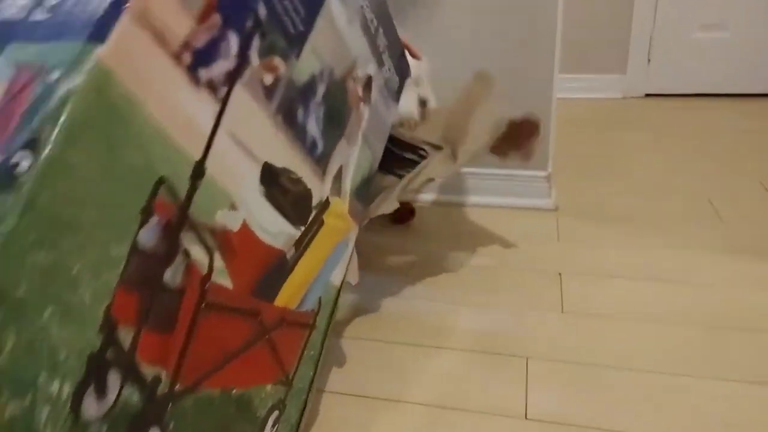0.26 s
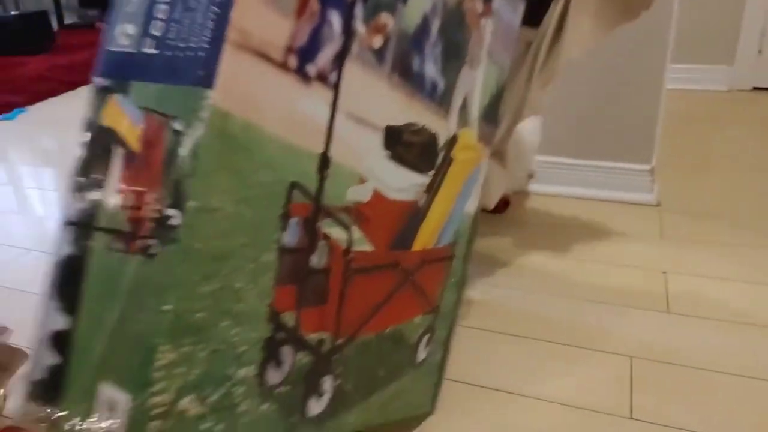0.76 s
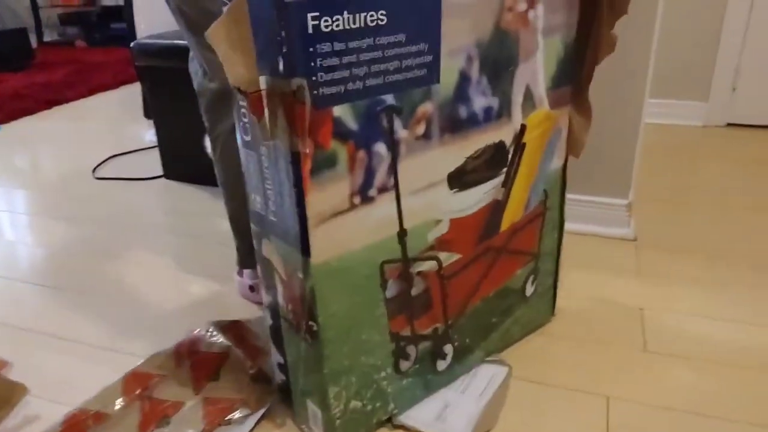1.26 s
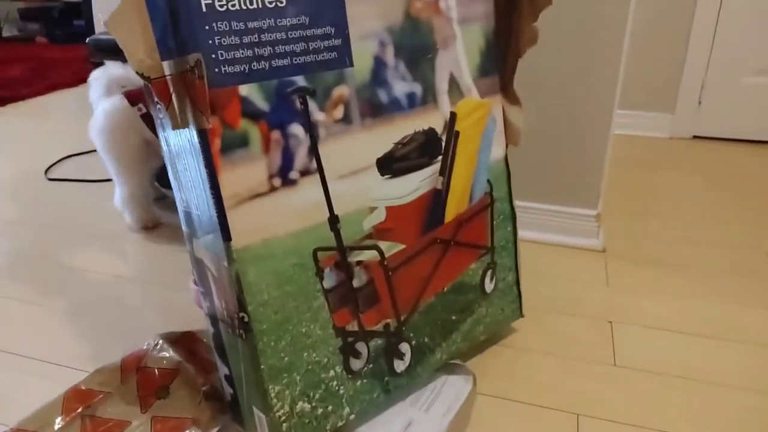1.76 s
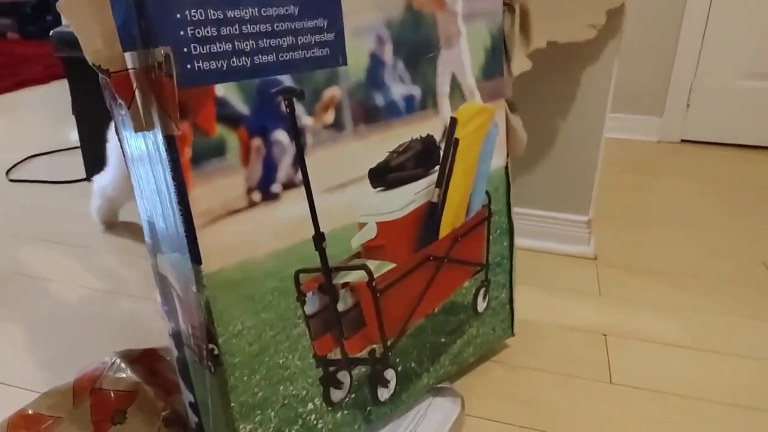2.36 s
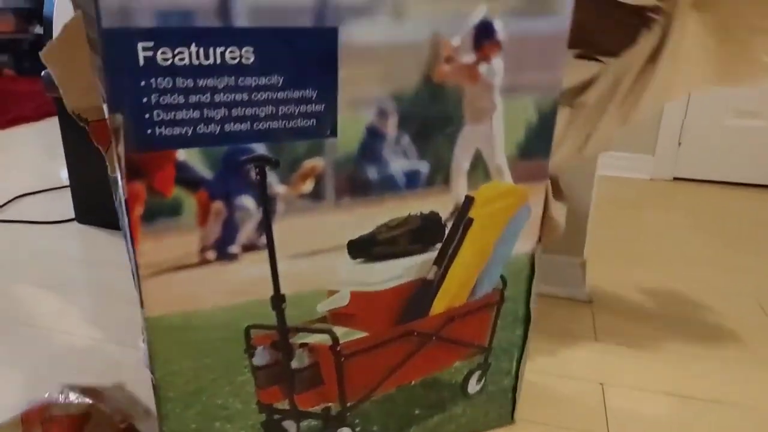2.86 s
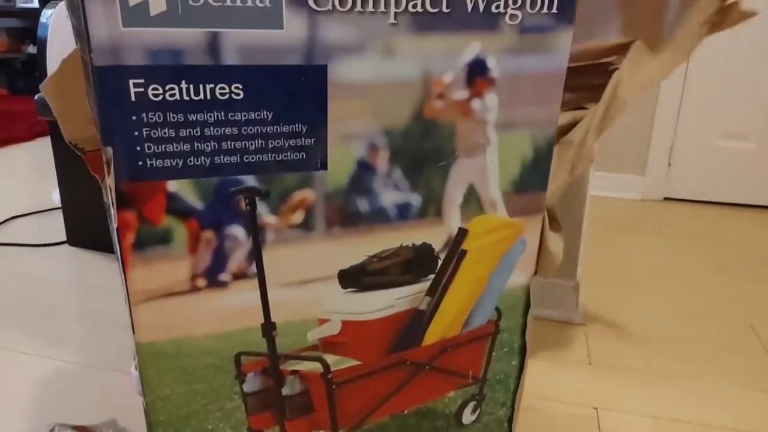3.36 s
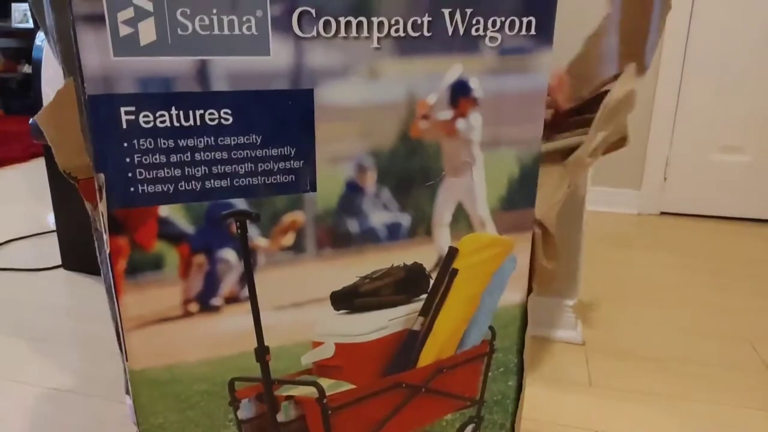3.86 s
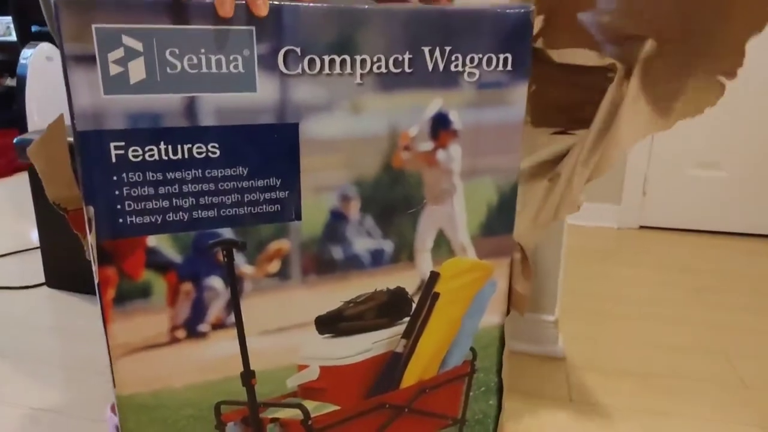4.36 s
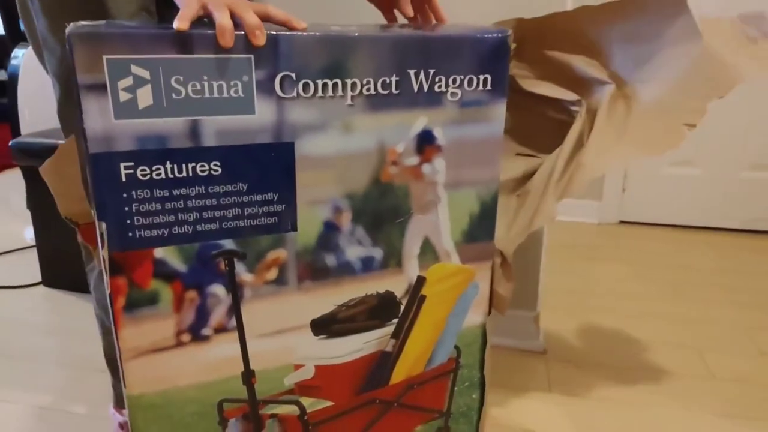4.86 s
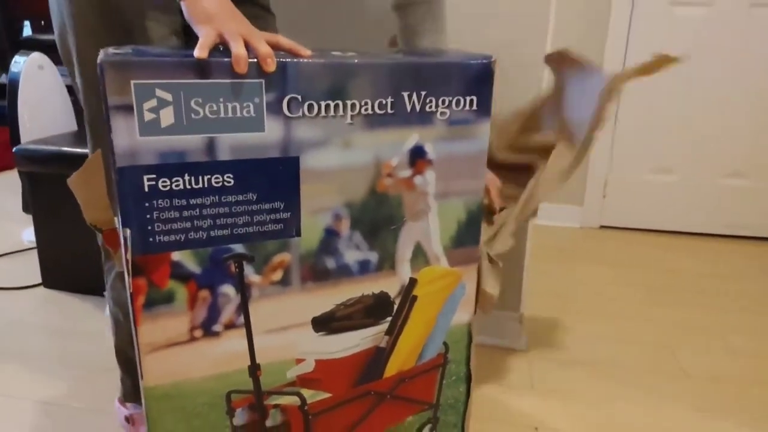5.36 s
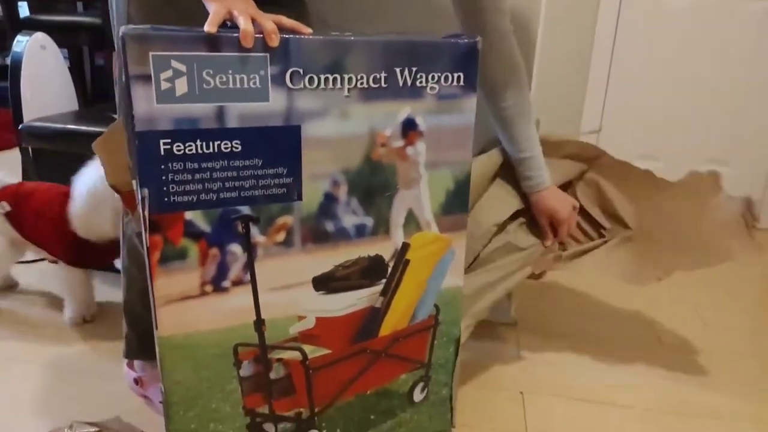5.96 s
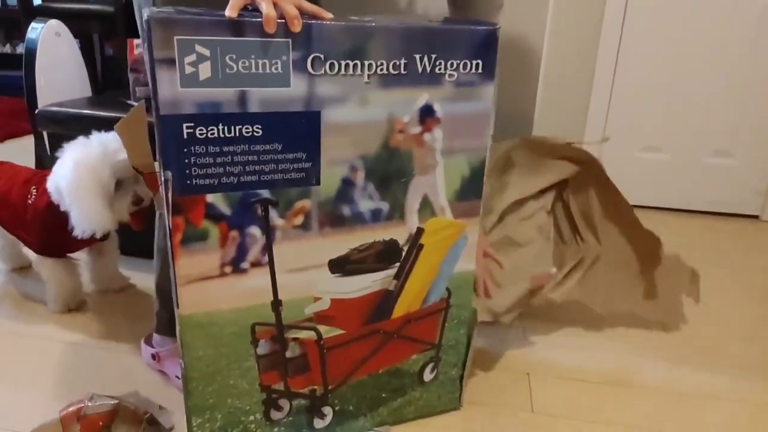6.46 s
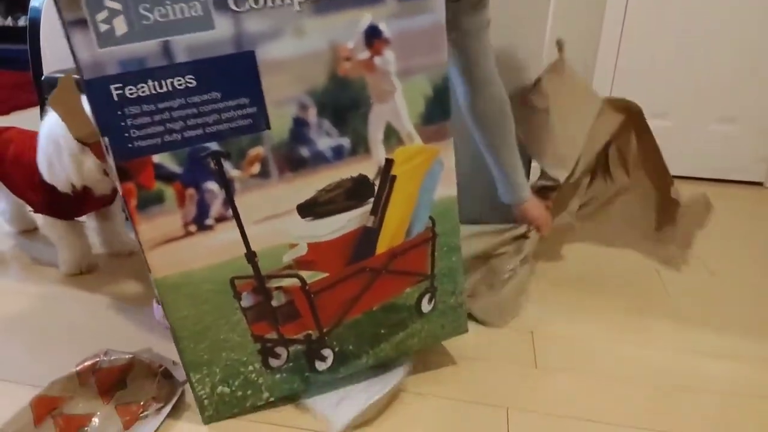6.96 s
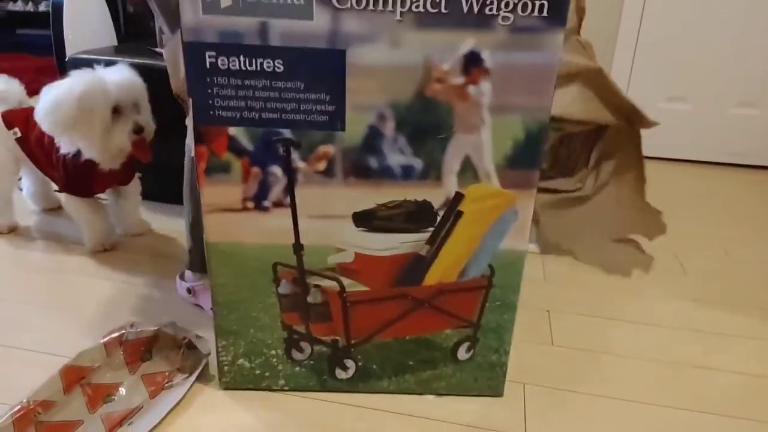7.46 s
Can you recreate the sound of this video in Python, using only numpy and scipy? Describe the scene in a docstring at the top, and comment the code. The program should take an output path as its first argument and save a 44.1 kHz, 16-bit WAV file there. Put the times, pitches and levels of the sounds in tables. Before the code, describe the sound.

A big carton is unwrapped indoors, heard by one close microphone. Dry creases snap and fine crackle swells as the box shifts and bumps the floor. Quieter fidgeting rustles follow, thinning to almost nothing before five seconds. Then the paper is ripped and crushed hard in two loud surges, with boomy panel flaps and low hollow thuds, and keeps crackling to the end. Short room tail.

```python
"""Stiff wrapping paper is pulled off a big cardboard box and crumpled in a hard-floored room.
Creases buckle as showers of tiny cracks through ringing facets, and as loud single snaps from noise bursts.
Wide panels boom dully as clicks excite broad resonances; the hollow box rings in six modes under drag and knocks.
Near echoes follow the crackle and rumble; a diffuse tail follows these, the snaps and the knocks.
A faint hush lies under it all. One microphone hears everything, copied to both channels."""
import sys
import numpy as np
from scipy import signal
from scipy.fft import rfft, irfft
from scipy.io import wavfile

SR = 44100
rng = np.random.default_rng(int(sys.argv[2]) if len(sys.argv) > 2 else 0)


def to_wav(sig):
    """Store sig (one row per channel, or 1-D mono) as 16-bit WAV at the path in sys.argv[1].

    Samples outside -1..1 are clipped; the rate is SR.
    """
    pcm = np.clip(np.atleast_2d(sig), -1, 1) * 32767
    pcm = np.round(pcm).astype(np.int16)
    wavfile.write(sys.argv[1], SR, pcm.T)  # frames by channels


N = 340011   # length in samples


def rustle():
    """Handling drives fine cracks, the panels between creases and the box under the paper."""
    crackle_gain = from_db(handling())
    paper = paper_crackle(crackle_gain)
    rumble, heave = box_drag(crackle_gain)
    return paper + rumble, heave


# How hard the sheet is pulled: time_s [s], crackle_db [dB]
PULL_CURVE = [(0, -44), (.22, -44.5), (.39, -57), (.47, -46), (.55, -57), (.66, -45), (.86, -42),
              (.93, -37), (1.14, -34.5), (1.3, -46.5), (1.48, -73), (2.06, -55.5), (2.3, -56), (2.45, -52),
              (2.55, -55), (2.7, -78), (2.77, -55), (3.03, -53), (3.26, -63), (3.4, -46), (3.85, -52.5),
              (4.23, -58.5), (4.64, -79), (5.26, -75.5), (5.41, -37.5), (5.72, -36.5), (6.05, -47.5),
              (6.2, -45), (6.44, -54), (6.54, -35), (6.7, -35.5), (7.07, -33.5), (7.34, -38), (7.45, -35.5),
              (7.62, -42), (7.71, -40)]
# A hand closes on the paper: peak_s [s], crackle_db [dB], rise_s [s]
HAND_GRABS = [(.13, -45, .05), (.2, -43, .03), (1.07, -44.5, 0.025), (1.59, -52, .08), (1.95, -63, 0.13),
              (2.12, -41, 0.032), (2.19, -40.5, .04), (2.25, -38.5, 0.077), (2.53, -49, .02),
              (2.6, -42, .015), (2.63, -46, 0.059), (2.86, -47.5, 0.1), (2.942, -46, 0.013),
              (3.06, -41, .015), (3.15, -43.5, 0.049), (3.281, -43, 0.011), (3.5, -36.5, 0.08),
              (3.56, -37.5, 0.1), (3.71, -49, 0.024), (3.949, -39.5, 0.17), (4.17, -58.5, 0.023),
              (4.44, -62, 0.11), (4.76, -76, .02), (5.01, -68, .02), (5.16, -61, 0.069),
              (5.52, -38.5, 0.032), (5.6, -30.5, 0.024), (5.67, -31.5, 0.033), (5.752, -19.5, 0.011),
              (5.829, -22, 0.1), (5.9, -31, 0.095), (6.098, -37.5, 0.023), (6.809, -18.5, 0.093),
              (6.892, -17.5, 0.084), (6.96, -23.5, 0.15), (7.18, -49, 0.026), (7.41, -41, 0.18)]
RISE_FROM_DB, LET_GO_DB_PER_S = -14, 151   # a grab swells from this far down, then dies away


def handling():
    """Crackle level in dB: the steady pull and every grab add up in power."""
    coarse_t = np.arange(0, N + 64, 64) / SR
    grab_power = 0
    for peak_s, crackle_db, rise_s in HAND_GRABS:
        swell_db = RISE_FROM_DB * (peak_s - coarse_t) / max(rise_s, .005)
        fade_db = LET_GO_DB_PER_S * (peak_s - coarse_t)
        grab_db = crackle_db + np.where(coarse_t < peak_s, swell_db, fade_db)
        grab_power = grab_power + from_db(grab_db) ** 2
    grab_power = np.interp(np.arange(N) / SR, coarse_t, grab_power)
    pull_power = from_db(in_time(PULL_CURVE)[0]) ** 2
    return 10 * np.log10(grab_power + pull_power)


# How the sheet is held: time_s [s], crisp_db (crackle above CRISP_HZ) [dB re crackle],
# boom_db (panel boom) [dB re crackle]
SHEET_HOLD = [(0, -9, 5), (.38, -11, -0.5), (.53, -19, 2), (.65, -8, -6), (.8, -0.5, -7), (1.1, -2, 2),
              (1.61, -16, 3.5), (1.94, -3, -0.5), (2.2, -6.5, -1.5), (2.65, -12, -11), (2.9, -3.5, -7.5),
              (3.3, -6, -3.5), (3.71, -14.5, -5.5), (3.96, -18, -13), (4.09, 2.5, -2), (4.5, -28, 2),
              (4.75, -6, 6), (5.05, -12, -3), (5.64, -6, -1), (6.0, -12, -5.5), (6.28, 0, -7),
              (6.34, -8, 0), (6.4, -19, -4), (6.79, -1, 1.5), (7.1, -10, -2), (7.71, -3.5, 0)]
# Tone of the cracks at the microphone, also used by the snaps: pitch_hz [Hz], density_db [dB per Hz]
PAPER_TONE = [(760, -23.5), (1300, -6), (1570, -4.5), (2090, -8), (2710, -4.5), (3420, -6.5), (3920, -2.5),
              (5090, -2.5), (5660, -5), (6550, -5.5), (8520, -12.5), (11300, -4), (11900, -4.5),
              (13100, -23.5), (16000, -20)]
MELLOW_HZ, CRISP_HZ = 2600, 8000   # upper edge of mellow and lower edge of crisp crackle
MELLOW_DB, MELLOW_FOLLOWS = -9, 0.23   # mellow re crackle; share of the boom's dB swing it follows
FIBRE_DB, FIBRE_FOLLOWS = 7.5, 0.31   # fibres re facets at 0 dB crackle; share of the crackle's dB swing
TICKS_PER_S, TICK_DB = 45, -13   # lone dry ticks of small creases, re crackle


def paper_crackle(crackle_gain):
    """Cracks ring facets, fibres tear dry and ticks stand alone; the bands are balanced by the hold."""
    crisp_db, boom_db = in_time(SHEET_HOLD)
    shower = cracks(14000, spread_db=2.5, clump_db=0.0, clump_hz=44.4)
    dealt = rng.integers(0, 36, N)
    facets = 0
    # every facet has a pitch of its own and rings a few cycles
    for k, hz in enumerate(np.geomspace(1300, 16000, 36)):
        facets = facets + resonance(shower * (dealt == k), hz, 0.15 * hz) * hz ** -.5
    fibres = cracks(20000, spread_db=0.5, clump_db=2.0, clump_hz=60)   # dense, dry, no pitch
    texture = rms_one(facets) + from_db(FIBRE_DB) * crackle_gain ** FIBRE_FOLLOWS * fibres
    ticks = resonance(cracks(TICKS_PER_S, spread_db=3.0, clump_db=1.5, clump_hz=5), 8200, 7000)
    texture = rms_one(texture) + from_db(TICK_DB) * rms_one(ticks)

    dull, crisp = split(colour(texture, PAPER_TONE), CRISP_HZ)
    mellow, plain = split(dull, MELLOW_HZ)
    mellow_gain = from_db(MELLOW_DB + MELLOW_FOLLOWS * boom_db)
    balanced = rms_one(plain) + mellow_gain * rms_one(mellow)
    balanced = balanced + from_db(crisp_db) * rms_one(crisp) + from_db(boom_db) * panel_boom()
    return crackle_gain * balanced


# Tone of the sheet's wide panels: pitch_hz [Hz], level_db [dB per Hz]
PANEL_TONE = [(200, -37), (340, -4.5), (387, -2.5), (450, -3.5), (566, 6), (772, -1.5), (1500, -1.5),
              (1950, -35), (3300, -120)]


def panel_boom():
    """Wide panels between creases: sparser pops dealt to 14 broad resonances that wander in level."""
    dealt, pops = rng.integers(0, 14, N), cracks(4000, spread_db=1.0, clump_db=3.0, clump_hz=30.8)
    boom = 0
    for k, hz in enumerate(np.geomspace(340, 1300, 14)):
        ring = resonance(pops * (dealt == k), hz, 0.098 * hz)
        boom = boom + wandering_gain(30, spread_db=2.5) * from_db(at_hz(PANEL_TONE, hz)) * ring
    return rms_one(boom)


# Single creases snapping, levels set before the tone of the paper: start_s [s], level_db [dB peak],
# crease_hz [Hz], edge_db (crisp edge) [dB re level_db], pop_db (dull pop) [dB re level_db], pop_hz [Hz]
CREASE_SNAPS = [(.05, -13.5, 4000, 7.5, -20, 1260), (.121, -18, 5200, 6, -26, 990),
                (0.176, -11, 5600, 1, -20, 900), (.329, -18, 2750, -0.5, -24, 996),
                (.408, -21, 1520, -8, -11.5, 860), (.509, -33.5, 2650, -24, 7, 816),
                (.581, -15.5, 2800, -0.5, -21, 1380), (.965, -12, 6440, -6, -19.5, 510),
                (1.025, -16, 1670, -5, -5, 1160), (1.074, -22, 1560, 2, -7, 1050),
                (1.41, -35, 6200, -9, -35, 533), (1.505, -37, 2330, -9, -11, 790),
                (1.555, -25.5, 2740, -3, -14, 1150), (1.675, -21.5, 6000, -8, -21.5, 480),
                (1.932, -24, 2940, 9, -43, 1510), (2.022, -22.5, 1710, -26, -26, 460),
                (2.113, -19, 6350, 12.5, -9.5, 490), (2.167, -15, 4600, 6, -28, 567),
                (2.222, -18.5, 6130, 7.5, -12.5, 423), (2.236, -17, 3400, 6, -10.5, 870),
                (2.419, -24.5, 7640, 6, -19, 1310), (2.511, -28, 6300, 4, -21, 837),
                (2.588, -25.5, 3850, 7, -10.5, 960), (2.748, -37, 4850, 2, -23, 1010),
                (2.991, -33.5, 8100, 20.5, -18, 810), (3.044, -16.5, 2580, -8, -22.5, 960),
                (3.079, -24, 2720, -6, -9, 1190), (3.123, -16.5, 2480, -1, -27, 880),
                (3.29, -15.5, 4960, 1.5, -36, 1150), (3.368, -18.5, 2870, 5.5, -19, 430),
                (3.453, -16, 4140, 1, -25, 560), (3.543, -27.5, 4220, 6, -3, 1180),
                (3.568, -19, 1530, 3, -13, 1120), (3.709, -29, 4320, -4, -6, 950),
                (3.792, -23.5, 4320, 15, -9.5, 960), (3.825, -23, 4150, 9, -17.5, 478),
                (3.894, -15, 3970, 2, -23.5, 460), (3.911, -21.5, 4220, 9, -8.5, 980),
                (3.932, -16, 4400, 12, -34, 1040), (3.942, -17, 2880, -15, -22, 1510),
                (4.153, -23, 4440, -2, -24, 1460), (4.498, -37.5, 2740, -24, -21, 674),
                (4.644, -47, 2780, -8, -10, 567), (4.738, -46.5, 3250, -18, -5, 1270),
                (4.985, -33.5, 3760, -30, -27, 496), (5.144, -31, 1460, -3, -49, 1390),
                (5.315, -34, 4630, 8, -25, 560), (5.33, -24, 2900, 1, -20, 1010),
                (5.373, -20, 4080, 0, -8.5, 1230), (5.395, -19, 5190, 5, -7, 590),
                (5.443, -23, 4500, 11, -22, 570), (5.527, -16.5, 2290, 10, -12, 1160),
                (5.593, -8.5, 6800, 11, -9, 725), (5.645, -9, 4400, -5, -13, 640),
                (5.656, -3, 6430, 3, -11, 730), (5.734, -3, 6930, 2, -18.5, 765),
                (5.747, 4.5, 5060, 8.5, -19, 554), (5.833, -5.5, 4000, 11, -17, 546),
                (6.084, -16.5, 4640, 2, -15.5, 500), (6.209, -28, 3900, -1, -31, 563),
                (6.324, -22, 3780, -22, -19, 1230), (6.462, -32.5, 4090, 11.5, -27, 587),
                (6.506, -20.5, 4260, 0, -12.5, 926), (6.528, -27, 5100, 14, -9, 525),
                (6.56, -13, 4130, 5, -33, 560), (6.687, -14.5, 4230, 7, -9, 565),
                (6.748, -2, 3960, 4, -8.5, 1020), (7.175, -13, 5510, 8.5, -20.5, 604),
                (7.392, -13, 4150, -10, -33, 576)]
SNAP_S, AFTER_DB, AFTER_S = 0.0035, -7, 0.015   # length of a snap; level and fade of the crackle after it


def snaps():
    """A crease gives way in milliseconds and crackles on: a ring at its pitch, a crisp edge, a dull pop."""
    length = 4096
    t = np.arange(length) / SR
    body, edge, pop = np.zeros((3, N + length))
    after = from_db(AFTER_DB) * np.exp(-t / AFTER_S) * np.clip(t / 0.0064, 0, 1)
    shape = np.exp(-(2 * t / SNAP_S - 1) ** 2) + after
    noises = rng.standard_normal((len(CREASE_SNAPS), length))
    for row, noise in zip(CREASE_SNAPS, noises):
        start_s, level_db, crease_hz, edge_db, pop_db, pop_hz = row
        start = round(start_s * SR)
        here = slice(start, start + length)
        burst = noise * shape * np.clip(t / 0.0022, 0, 1)   # the crack runs along the crease
        ringing = .5 * burst + 0.84 * resonance(burst, crease_hz, .5 * crease_hz)
        body[here] += from_db(level_db) * peak_one(ringing)
        sharp = burst * np.exp(-t / 0.011)   # the highest pitches die first
        edge[here] += from_db(level_db + edge_db) * peak_one(sharp)
        flip = burst + 8.1 * (np.arange(length) == 40)   # the panel flips over in one stroke
        popped = resonance(resonance(flip, pop_hz, 0.28 * pop_hz), pop_hz, 1.86 * pop_hz)
        pop[here] += from_db(level_db + pop_db) * peak_one(popped)
    body_low = split(colour(body, PAPER_TONE), CRISP_HZ)[0]
    edge_high = split(colour(edge, PAPER_TONE), CRISP_HZ)[1]
    return (body_low + edge_high + pop)[:N]


# How much of the pull passes into the box, before the rumble and heave trims:
# time_s [s], load_db [dB re crackle]
BOX_DRIVE = [(0, -2), (.25, -6), (.7, -22), (.87, -20), (.93, -3.5), (1.15, 1.5), (1.2, 20), (1.45, -3.5),
             (1.9, -14), (2.2, 0.5), (2.6, -18), (2.68, -12), (2.9, -28), (3.1, -11), (3.4, -16),
             (3.56, -6), (3.9, -2), (4.3, -4.5), (4.65, 5), (5.3, -6), (5.5, -5), (5.65, 0), (5.88, -6.5),
             (5.95, -15), (6.3, -11), (6.53, -1), (6.65, -9), (6.78, -1), (6.9, -2.5), (7.0, -1.5),
             (7.21, -21), (7.34, -2), (7.42, -25), (7.5, 14), (7.6, 4), (7.71, -2)]
RUMBLE_FLICKER_DB = 2.0   # spread of the wandering rumble level


def box_drag(crackle_gain):
    """Noise at the level of the pull rings the hollow box and moves air with the whole of it."""
    load_db, = in_time(BOX_DRIVE)
    drag_gain = crackle_gain * from_db(load_db) * wandering_gain(20, spread_db=RUMBLE_FLICKER_DB)
    rumble = box_ring(rng.standard_normal((len(BOX_MODES), N)))
    heave = resonance(resonance(rng.standard_normal(N), 106, 44), 75, 72)   # air moved by the whole box
    return from_db(-5) * drag_gain * rms_one(rumble), from_db(-28.5) * drag_gain * rms_one(heave)


# The box knocks on the floor, levels set before the filters: start_s [s], level_db [dB],
# push_db (deep push) [dB re level_db], favoured_hz (pitch that the contact point favours) [Hz]
BOX_KNOCKS = [(1.078, -46, -39, 231), (1.168, -21.5, -20, 255), (1.214, -30, -5, 191),
              (1.27, -24, -30, 213), (2.127, -40, -32, 265), (2.24, -50, -41, 261), (2.671, -44, -32, 237),
              (2.944, -45.5, -27, 170), (3.084, -36, -39, 170), (3.498, -65, -37, 218),
              (3.816, -37, -35, 211), (3.921, -44, -31, 207), (4.621, -51.5, -30, 159),
              (5.246, -43, -24, 148), (5.585, -18, -40, 208), (5.735, -12.5, -26, 201),
              (6.527, -44, -41, 272), (6.756, -19.5, -25, 280), (6.836, -28, -30, 229),
              (7.316, -52, -34, 223), (7.482, -29.5, -25, 272), (7.567, -15.5, -35, 178),
              (7.662, -26, -42, 175)]


def knocks():
    """Soft contact lasting some milliseconds: new strengths for each mode, a slow push of air under them."""
    start_s, level_db, push_db, favoured_hz = np.transpose(BOX_KNOCKS)
    at = np.round(start_s * SR).astype(int)
    clicks, push = np.zeros((len(BOX_MODES), N)), np.zeros(N)
    chance_db = 2.5 * rng.standard_normal((len(at), len(BOX_MODES)))
    mode_hz = np.array(BOX_MODES)[:, 0]
    octaves_off = np.abs(np.log2(mode_hz / favoured_hz[:, None]))
    click_db = level_db[:, None] - 13.0 + chance_db - 20.0 * octaves_off
    clicks[:, at] = from_db(click_db).T
    push[at] = from_db(level_db + push_db + 58)   # the boost makes up for the narrow filters
    soft = signal.butter(2, 260, fs=SR, output="sos")
    knock = signal.sosfilt(soft, box_ring(clicks))
    return knock, resonance(resonance(resonance(push, 60, 61.5), 55, 90), 45, 60)


# Modes of the box: pitch_hz [Hz], level_db [dB], t60_s [s]
BOX_MODES = [(170, -8.5, 0.47), (196.4, -1.5, 0.29), (223.2, 2.5, 0.21), (273, 10.5, 0.093),
             (305, -20, 0.16), (384, -5, 0.14)]


def box_ring(drives):
    """The air and walls of the box: decaying modes, each driven by its own row."""
    out = 0
    for drive, (hz, level_db, t60_s) in zip(drives, BOX_MODES):
        r, w = from_db(-60 / (t60_s * SR)), 2 * np.pi * hz / SR
        gain = from_db(level_db) * np.sin(w)
        out = out + signal.lfilter([0, gain], [1, -2 * r * np.cos(w), r * r], drive + 1e-18)
    return out


def near_echoes(x):
    """Floor and box side send the sound again a moment later; the extra path wanders as the hands move."""
    now = np.arange(N)
    floor_delay = 0.000793 * SR * from_db(2.0 * drift(1.46))
    side_delay = .0027 * SR * from_db(1.487 * drift(1.14))
    floor = np.interp(now - floor_delay, now, x)
    side = np.interp(now - side_delay, now, x)
    return x + from_db(-9) * floor + from_db(-8) * side


# Decay of the room: pitch_hz [Hz], t60_s [s]
ROOM_DECAY = [(100, 0.19), (1000, 0.35), (5000, 0.059), (14000, 0.35)]


def room(x):
    """Diffuse tail: noise that dies octave by octave, after the first wall."""
    t, tail = np.arange(SR // 2) / SR, 0
    for hz in 62.5 * 2. ** np.arange(8):
        band = signal.butter(2, [hz, 2 * hz], "band", fs=SR, output="sos")
        noise = signal.sosfilt(band, rng.standard_normal(len(t)))
        tail = tail + noise * from_db(-60 * t / at_hz(ROOM_DECAY, 0.9 * hz))
    tail = tail * np.clip(t / 0.0011 - .5, 0, 1)   # a short gap, then a fast fade-in
    return signal.fftconvolve(x, tail / np.sqrt(np.sum(tail ** 2)))[:N]


# Tone of the hush: pitch_hz [Hz], density_db [dB per Hz], relative
HUSH_TONE = [(15, -49), (25, 6), (237, 18), (407, -39), (1090, 9), (1870, -52), (2680, 3), (4500, -49),
             (7740, -70), (12000, -17.5), (15600, -43), (22000, -120)]
HUSH_DB = -71   # rms level


def hush():
    """Steady coloured noise under everything."""
    return from_db(HUSH_DB) * rms_one(colour(rng.standard_normal(N), HUSH_TONE))


def cracks(per_s, spread_db, clump_db, clump_hz):
    """Random clicks, a few louder than the rest by spread_db; a drift of clump_db sways their size."""
    sizes_db = spread_db * np.minimum(rng.exponential(1, N), 5) + clump_db * drift(clump_hz)
    signs = rng.choice([-1, 1], N)
    return rms_one(from_db(sizes_db) * signs * (rng.random(N) < per_s / SR))


def wandering_gain(rate, spread_db):
    """Randomly wandering gain for panel boom and box rumble: dB points, rate per second, joined by lines."""
    points = spread_db * rng.standard_normal(int(N / SR * 60))
    return from_db(np.interp(np.arange(N) * rate / SR, np.arange(len(points)), points))


def drift(rate):
    """Slow chance: noise twice through a one-pole low-pass at rate Hz, spread 1."""
    r = np.exp(-2 * np.pi * rate / SR)
    noise = rng.standard_normal(N + SR)
    return rms_one(signal.lfilter([1], [1, -2 * r, r * r], noise)[SR:])   # drop the run-in


def resonance(x, hz, width_hz):
    """Two-pole band-pass, gain about 1 on top."""
    r = np.exp(-np.pi * width_hz / SR)
    poles = [1, -2 * r * np.cos(2 * np.pi * hz / SR), r * r]
    return signal.lfilter([(1 - r * r) / 2, 0, (r * r - 1) / 2], poles, x + 1e-18)


def colour(x, spectrum):
    """Causal (minimum-phase) filter with the given spectrum, by folding its cepstrum."""
    cepstrum = irfft(np.log(from_db(at_hz(spectrum, np.linspace(1, SR / 2, 4097)))))
    cepstrum[1:4096] *= 2
    cepstrum[4097:] = 0
    return signal.fftconvolve(x, irfft(np.exp(rfft(cepstrum))))[:len(x)]


def split(x, hz):
    """Below and above an edge."""
    filters = [signal.butter(4, hz, kind, fs=SR, output="sos") for kind in ("low", "high")]
    return [signal.sosfilt(sos, x) for sos in filters]


def in_time(rows):
    """Columns of a table, joined by lines in time."""
    time_s, *columns = np.transpose(rows)
    return [np.interp(np.arange(N) / SR, time_s, column) for column in columns]


def at_hz(points, hz):
    """Read a table on a log-frequency axis."""
    table_hz, values = np.transpose(points)
    return np.interp(np.log(hz), np.log(table_hz), values)


def from_db(db):
    """Decibels to gain."""
    return 10 ** (np.asarray(db) / 20)


def rms_one(x):
    """Scale to rms 1."""
    return x / np.sqrt(np.mean(x ** 2) + 1e-20)


def peak_one(x):
    """Scale to peak 1."""
    return x / np.abs(x).max()


def scene():
    """Paper and box in the room, over its hush."""
    hits = snaps()
    paper, heave = rustle()
    knock, push = knocks()
    room_send = from_db(-10.0) * paper + hits + from_db(7.0) * knock
    mix = near_echoes(paper) + hits + knock + room(room_send)
    # paper and box radiate little deep bass
    mix = signal.sosfilt(signal.butter(6, 148, "high", fs=SR, output="sos"), mix)
    return np.tile(mix + heave + push + hush(), (2, 1))


CUTOFF_HZ = 16200   # 90 dB down from here up


def record(dry):
    """Peaks are rounded, the top is cut."""
    rounded = .72 * np.tanh(dry / .72)
    return signal.sosfilt(signal.cheby2(22, 90, CUTOFF_HZ, fs=SR, output="sos"), rounded)


dry = scene()
out = record(dry)
to_wav(out)
```